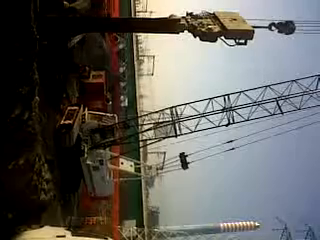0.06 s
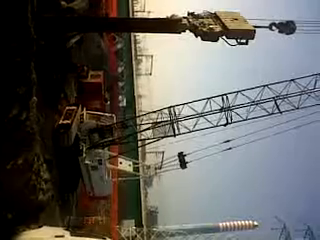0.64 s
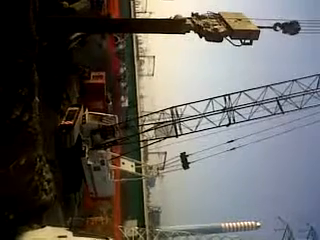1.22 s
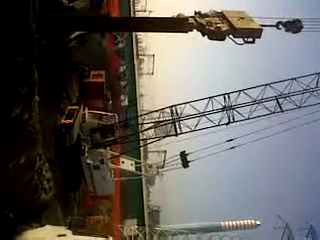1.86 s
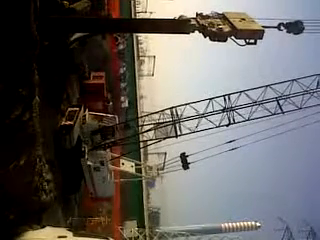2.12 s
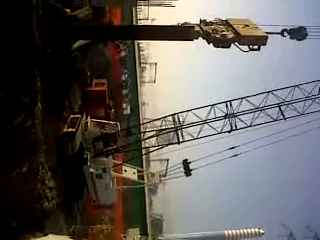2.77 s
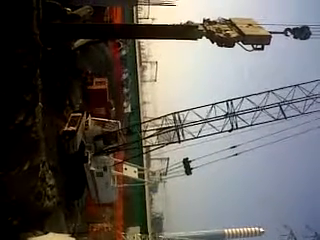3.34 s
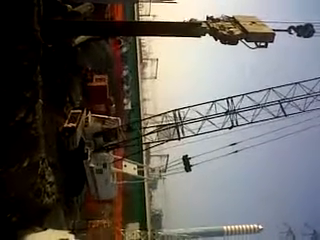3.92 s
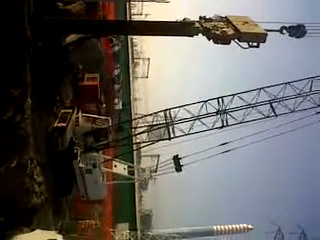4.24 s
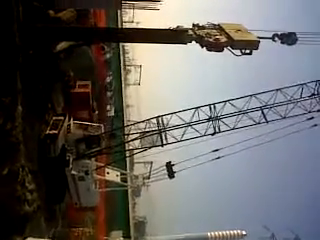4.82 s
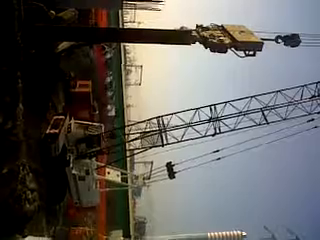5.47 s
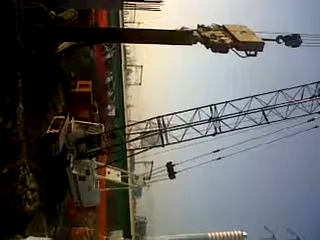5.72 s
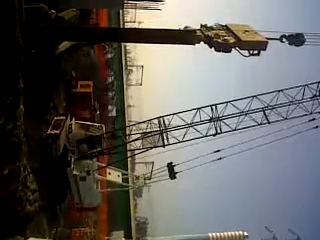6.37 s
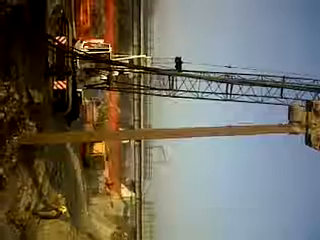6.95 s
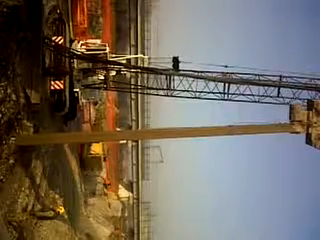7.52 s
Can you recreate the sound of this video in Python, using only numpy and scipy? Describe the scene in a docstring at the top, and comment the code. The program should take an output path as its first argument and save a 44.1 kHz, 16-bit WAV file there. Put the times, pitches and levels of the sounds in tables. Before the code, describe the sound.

A loud, steady diesel hum with metallic clatter and whining machinery, until a tick switches to a duller roar.

```python
"""A loud diesel drone switches on abruptly: cranes and a hydraulic pile extractor on a building site.
A six-cylinder engine holds its speed under load, and its combustion clatter rings the steel housings.
A pump, gears and fans whine over it; behind, a second engine runs slightly faster and a third machine hums.
Near the end a tick cuts to another spot on the site, where the small microphone hears a duller sound
with less hum."""
import sys
import numpy as np
from scipy import signal
from scipy.fft import rfft, irfft
from scipy.io import wavfile

SR = 44100
rng = np.random.default_rng(int(sys.argv[2]) if len(sys.argv) > 2 else 0)


def master_out(mix):
    """Clip the mix to full scale and print it as 16-bit PCM to the path in sys.argv[1]."""
    frames = np.transpose(np.atleast_2d(mix))
    ceiling = np.clip(frames, -1, 1)
    pcm = np.round(ceiling * 32767).astype(np.int16)
    wavfile.write(sys.argv[1], SR, pcm)


N = 339570
T = np.arange(N) / SR
FREQ = np.arange(N // 2 + 1) * SR / N
START_S, CUT_S = 0.1737, 6.9722  # the first spot opens; the second takes over


def diesel_cycle():
    """Cycles of six firings turned by the main diesel; its governed speed sags once as it takes up load."""
    firing_hz, sag_hz = 108.25, 0.55
    return turns(firing_hz - sag_hz * swell(at_s=2.6, half_s=0.8)) / 6


def firing(cycle):
    """The strong tone at the firing rate and a high singing partial grow, while the octave recedes."""
    growing_s = np.maximum(T - 3.33, 0)
    base_db, singing_db = 0.92 * growing_s, -15.5 + 3 * growing_s
    octave_db = np.interp(T, (1.6, 4.7), (-11, -18.5))
    singing = tones(cycle, [(42, singing_db)], waver=0.5, waver_hz=6.2)
    base = tones(cycle, [(6, base_db)], waver=0.059, waver_hz=3.8)
    octave = tones(cycle, [(12, octave_db)], waver=0.24, waver_hz=2.9)
    return base + octave + singing


# The exhaust's clearest overtone at the first spot: time_s, relative_level_db
OVERTONE_LEVELS = [(.2, -13.5), (.65, -9), (.85, -18.5), (1.4, -16.5), (2.0, -12), (3.3, -10.5),
                   (4.0, -14.5), (5.5, -13), (6.8, -9)]
def overtone(cycle):
    """One exhaust overtone hangs above the hum, fading and returning."""
    level_db = np.interp(T, *np.transpose(OVERTONE_LEVELS))
    return tones(cycle, [(16, level_db)], waver=0.2, waver_hz=9)


# The weaker exhaust tones at the first spot: cycle_multiple, relative_level_db
EXHAUST_FIRST_SPOT = [(2, -12.5), (4, -19.5), (8, -17), (10, -11.5), (11, -25), (14, -18.5), (22, -24),
                      (24, -26), (44, -18.5), (62, -21), (70, -14)]
# The whole exhaust from the second spot: cycle_multiple, relative_level_db
EXHAUST_SECOND_SPOT = [(2, -20), (4, -21), (6, -8), (8, -8.5), (10, -14), (12, -10), (14, -22), (16, -23.5),
                       (20, -12), (24, -11), (42, -17.5)]
def exhaust(cycle, harmonics):
    """The low exhaust tones stand firm; the higher ones are unsteady."""
    low = [(multiple, db) for multiple, db in harmonics if multiple < 9]
    high = [(multiple, db) for multiple, db in harmonics if multiple >= 9]
    return tones(cycle, low, waver=0.11, waver_hz=4.6) + tones(cycle, high, waver=0.26, waver_hz=6)


# Broad mechanical roar at the first spot: frequency_hz, level_db_per_hz
ROAR_FIRST_SPOT = [(20, -84), (50, -78.5), (100, -70.5), (190, -67.5), (280, -66.5), (312, -69.5),
                   (350, -62), (376, -68), (460, -66), (580, -65), (900, -63), (980, -63.5), (1100, -63),
                   (1600, -63.5), (2450, -64.5), (2950, -71), (3550, -83.5), (3950, -91.5), (4500, -90),
                   (5900, -98.5), (6400, -102), (7000, -115)]
def clatter(cycle):
    """Knocks at every crank turn and a quicker valve rattle drive the roar and the ringing steel."""
    crank = knocks(2 * cycle, depth=0.3, decay_turns=0.25)
    valves = knocks(8 * cycle, depth=0.3, decay_turns=0.3)
    blows = crank * valves
    roar = colour(chatter(cycle, repeat=0.16) * blows, ROAR_FIRST_SPOT) * undb(0.5 * walk(35))
    ringing = housings(chatter(cycle, repeat=0.17) * blows)
    booms = steelwork(chatter(cycle, repeat=0.27) * blows)
    return roar + ringing + booms


# The roar from the second spot: frequency_hz, level_db_per_hz
ROAR_SECOND_SPOT = [(20, -81), (60, -76), (170, -67), (300, -64), (430, -56.5), (540, -52.5), (585, -59),
                    (650, -57.5), (690, -55), (760, -51.5), (880, -56.5), (980, -64.5), (1060, -60.5),
                    (1250, -59.5), (1370, -68.5), (1500, -68), (1900, -64.5), (2300, -65), (2700, -76.5),
                    (3000, -75), (4500, -95), (6500, -121)]
def dull_clatter(cycle):
    """A roar with less treble, pulsing at every crank turn."""
    crank = knocks(2 * cycle, depth=0.45, decay_turns=0.25)
    return colour(chatter(cycle, repeat=0.12) * crank, ROAR_SECOND_SPOT)


def chatter(cycle, repeat):
    """Valves and injectors strike alike in every cycle: a share of the noise repeats, the rest is new."""
    period_samples = N / cycle[-1]
    pattern = np.interp((cycle % 1) * period_samples, np.arange(N), noise())
    return np.sqrt(repeat) * pattern + np.sqrt(1 - repeat) * noise()


# Steel housings heard from the first spot: pitch_hz, width_hz, level_db_per_hz
HOUSING_MODES = [(540, 91, -55.5), (818.4, 61, -54.5), (866.7, 71, -61), (1027, 51, -59.5),
                 (1175, 68, -61.5), (1862, 110, -68.5), (2314, 120, -67.5)]
def housings(drive):
    """The clatter rings the housings, each resonance flickering a little in level."""
    return sum(undb(db + walk(20)) * resonate(drive, hz, width) for hz, width, db in HOUSING_MODES)


# Passing rings at the first spot: peak_s, half_length_s, pitch_hz, width_hz, level_db_per_hz
STEELWORK_RINGS = [(.45, .7, 500, 160, -60), (6.37, .3, 540, 60, -54), (6.3, 1.1, 1200, 410, -66)]
def steelwork(drive):
    """Now and then a part of the steelwork takes up the clatter and rings louder for a while."""
    return sum(undb(db) * swell(at_s, half_s) * resonate(drive, hz, width)
               for at_s, half_s, hz, width, db in STEELWORK_RINGS)


def howl():
    """A brief howl in the housings, heard from the second spot."""
    return whirr(hz=782, width_hz=35, db=-36) * swell(at_s=7.4, half_s=0.14)


# The hydraulic pump's whine at the first spot: piston_multiple, level_db
PUMP_TONES = [(1, -41), (3, -44.5), (4, -43.5), (5, -48.5), (6, -55.5)]
# Its partials that build up for a while: piston_multiple, peak_s, half_length_s, rise_db
PUMP_SWELLS = [(4, 4.25, 0.7, 3.5), (5, 4.4, 3.9, 5)]
def pump():
    """The pistons whine in harmonics of their nearly steady stroke rate."""
    piston_hz = 462.4 * (1 + 0.00048 * walk(1.96))
    strokes = turns(piston_hz)
    out = 0
    for multiple, db in PUMP_TONES:
        rise_db = sum(up * swell(at, half) for which, at, half, up in PUMP_SWELLS if which == multiple)
        out += tones(strokes, [(multiple, db + rise_db)], waver=0.31, waver_hz=13)
    return out


# Gear whine at the first spot: pitch_hz, level_db, peak_s, half_length_s, rise_db
GEAR_TONES = [(1767, -48, 2.4, 1.7, 3), (1798, -53.5, 1.5, 1.1, 9.5), (2062, -55.5, 1.6, .4, 5),
              (2237, -56, 3, 1.1, 9.5), (2340, -52, 5.3, 2, 7)]
def gears():
    """Clear gear tones tremble in pitch and wander in level, each swelling once."""
    tremble_hz, wander_db = 3, 2.5
    out = 0
    for hz, db, at_s, half_s, rise_db in GEAR_TONES:
        tone = sine(hz + tremble_hz * walk(7.7))
        out += tone * undb(db + rise_db * swell(at_s, half_s) + wander_db * walk(3.5))
    return out


# Bearings at the first spot: pitch_hz, width_hz, level_db
BEARING_BANDS = [(1011, 14, -43.5), (1081.5, 16, -46), (1122, 17, -45.5), (1490, 20, -44.5),
                 (1515, 3.3, -53)]
def bearings():
    """The bearings whirr restlessly in narrow bands of noise."""
    return sum(whirr(hz, width, db) for hz, width, db in BEARING_BANDS)


# Two fans, heard from both spots: pitch_hz, tremble_hz, flutter_db, first_spot_db, second_spot_db
FAN_TONES = [(617.5, 1.6, 0, -42.5, -37.5), (717.4, 2.8, 2.5, -41.5, -38.5)]
# Their swells: peak_s, half_length_s, lower_fan_rise_db, upper_fan_rise_db
FAN_SWELLS = [(0.5, 0.63, 7.5, -1), (.88, 0.081, -3, 8.5), (2.446, 0.16, 0, 6.5), (4.65, 0.3, 1.5, 7.5)]
def fans():
    """Blade tones tremble in pitch and now and then swell or dip; the upper one flutters in level."""
    out = 0
    for fan, (hz, tremble_hz, flutter_db, first_db, second_db) in enumerate(FAN_TONES):
        tone = sine(hz + tremble_hz * walk(11.8))
        spot_db = np.where(T < CUT_S, first_db, second_db)
        rise_db = sum(rises[fan] * swell(at_s, half_s) for at_s, half_s, *rises in FAN_SWELLS)
        out += tone * undb(spot_db + rise_db + flutter_db * walk(19))
    return out


# Metallic rasp of the machinery at the first spot: pitch_hz, width_hz, level_db_per_hz
RASP_MODES = [(4355, 55, -79), (4440, 55, -84), (4910, 70, -88.5), (5145, 70, -84.5), (5276, 62, -84.5),
              (5470, 50, -93)]
def rasp():
    """A thin ring chatters in quick, uneven flicks; each resonance catches and lets go on its own."""
    throb_hz = 77.2 * (1 + 0.004 * walk(3))
    throb = 1 + 0.46 * np.sin(2 * np.pi * turns(throb_hz))
    flicks = throb * undb(1.2 * walk(45))
    ring = sum(undb(db + 1.8 * walk(30)) * resonate(noise(), hz, width) for hz, width, db in RASP_MODES)
    return ring * unit_power(flicks)


# The second engine, in the background at both spots: cycle_multiple, level_db
SECOND_ENGINE_TONES = [(3, -66), (5, -52.5), (6, -58.5), (7, -53.5), (9, -47.5), (16, -61.5), (22, -52.5)]
def second_engine():
    """Another engine drones slightly faster than the main diesel, drifting a little."""
    cycle_hz = 18.7 * (1 + 0.0022 * walk(1))
    return tones(turns(cycle_hz), SECOND_ENGINE_TONES, waver=0.33, waver_hz=4.5)


# The third machine, faint at both spots: rate_multiple, level_db
THIRD_MACHINE_TONES = [(2, -51.5), (3, -51)]
def third_machine():
    """A further machine hums at its own speed."""
    rate_hz = 98.96 * (1 + 0.0022 * walk(1))
    return tones(turns(rate_hz), THIRD_MACHINE_TONES, waver=0.26, waver_hz=3.7)


# Light knocks and ticks at the first spot: start_s, pitch_hz, width_hz, gain_db
TICKS = [(3.8617, 1100, 1280, 3), (3.9640, 1400, 1480, 1.5), (6.9464, 4800, 1200, -16),
         (6.965, 4300, 900, -7.5)]
def ticks():
    """Small dry clicks: each is one spike through a broad resonance."""
    return sum(undb(db) * resonate(impulse(start_s), hz, width) for start_s, hz, width, db in TICKS)


def tones(cycle, harmonics, waver, waver_hz):
    """Harmonics of a rotating part; each wavers in strength and phase on its way through the air."""
    out = 0
    for multiple, db in harmonics:
        angle = 2 * np.pi * (multiple * cycle + rng.random()) + waver * walk(waver_hz)
        strength = undb(db) * (1 + waver * walk(waver_hz))
        out += strength * np.sqrt(2) * np.sin(angle)
    return out


def knocks(cycle, depth, decay_turns):
    """A gain of unit power that flares once a turn and dies away."""
    return unit_power(1 + depth * np.exp(-(cycle % 1) / decay_turns))


def whirr(hz, width_hz, db):
    """A narrow, restless band of noise."""
    band = resonate(noise(), hz, width_hz)
    return undb(db) * band / band.std()


def resonate(x, hz, width_hz):
    """A steep resonance with gain 1 at its centre."""
    detune = (FREQ ** 2 - hz ** 2) / ((FREQ + 1) * width_hz * np.pi / 2)
    return irfft(rfft(x) / (1 + 1j * detune) ** 2, N)


def colour(x, points):
    """Filter by a spectrum of (frequency_hz, gain_db) points."""
    hz, db = np.transpose(points)
    gain_db = np.interp(np.log(FREQ + 1), np.log(hz), db)
    return irfft(rfft(x) * undb(gain_db), N)


def lowpass(x, hz):
    """A steep treble cut."""
    return signal.sosfilt(signal.ellip(8, 0.2, 70, hz, fs=SR, output="sos"), x)


def noise():
    """White noise of unit power per Hz."""
    return rng.standard_normal(N) * np.sqrt(SR / 2)


def walk(rate_hz):
    """Smooth random wander with unit spread, moving at up to about rate_hz."""
    wander = irfft(rfft(rng.standard_normal(N)) * np.exp(-(FREQ / rate_hz) ** 2), N)
    return wander / wander.std()


def swell(at_s, half_s):
    """A smooth rise to 1 and back, centred on a moment."""
    return np.exp(-((T - at_s) / half_s) ** 2)


def impulse(at_s):
    """A single spike at a moment."""
    return 1.0 * (np.arange(N) == int(at_s * SR))


def sine(hz):
    """A tone of unit power at a moving pitch."""
    return np.sqrt(2) * np.sin(2 * np.pi * turns(hz))


def turns(hz):
    """Cycles completed at a moving rate."""
    return np.cumsum(hz) / SR


def unit_power(x):
    """Scale to a mean square of 1."""
    return x / np.sqrt(np.mean(x ** 2))


def undb(db):
    """Decibels to gain."""
    return 10 ** (np.asarray(db) / 20)


def scene():
    """The same machines heard from one spot on the site, then from another."""
    cycle = diesel_cycle()
    other_machines = second_engine() + third_machine()
    whine = bearings() + pump() + gears()
    background = other_machines + fans()

    first_hum = undb(-32) * (firing(cycle) + overtone(cycle) + exhaust(cycle, EXHAUST_FIRST_SPOT))
    first_spot = first_hum + clatter(cycle) + whine + rasp() + background

    second_roar = undb(0.5) * dull_clatter(cycle)
    second_hum = undb(-28.5) * exhaust(cycle, EXHAUST_SECOND_SPOT)
    second_spot = second_hum + second_roar + howl() + undb(-5) * whine + background

    switch_on = np.clip((T - START_S) / 0.002, 0, 1)
    fade_up = np.clip(0.18 + (T - CUT_S) / 0.1, 0, 1)  # the level dips briefly at the cut
    site = np.where(T < CUT_S, first_spot * switch_on, second_spot * fade_up)
    return (site + ticks())[None]


def record(dry):
    """A small camera microphone with little treble; the cut's click is electrical and stays brighter."""
    microphone = lowpass(dry, hz=6700)
    click = undb(-20) * impulse(CUT_S)
    return lowpass(microphone + click, hz=8100)


dry = scene()
out = record(dry)
master_out(out)
```